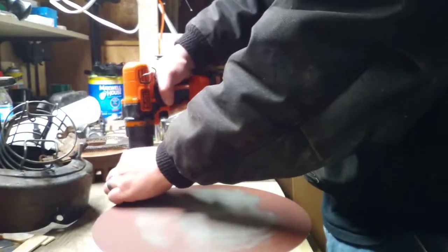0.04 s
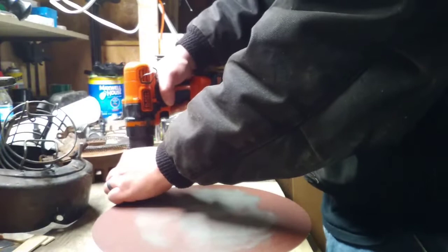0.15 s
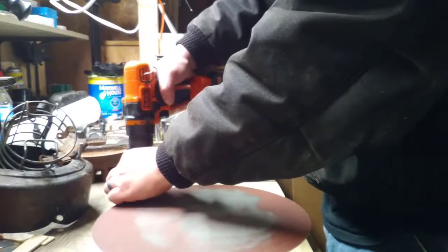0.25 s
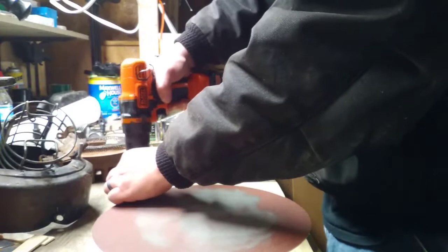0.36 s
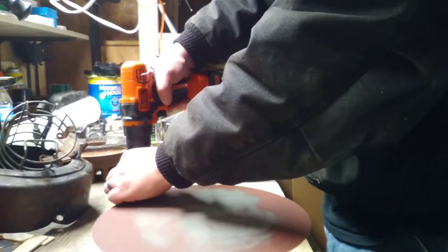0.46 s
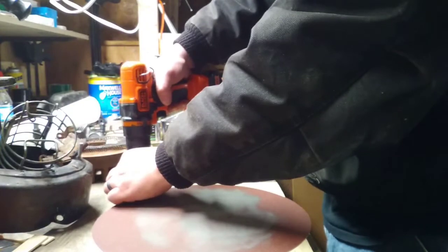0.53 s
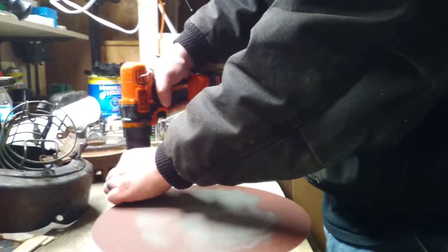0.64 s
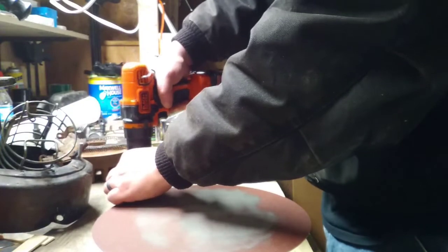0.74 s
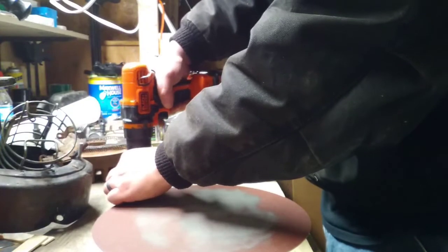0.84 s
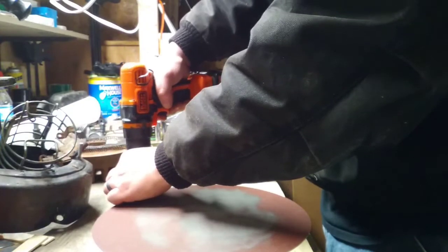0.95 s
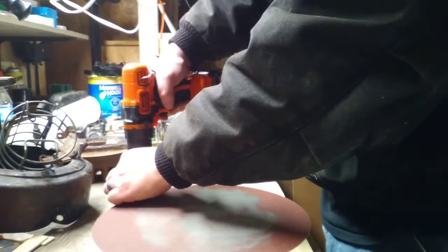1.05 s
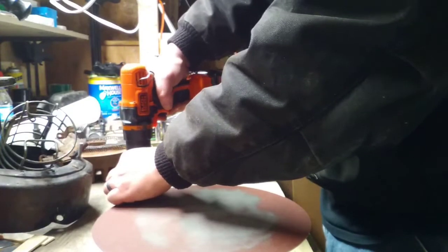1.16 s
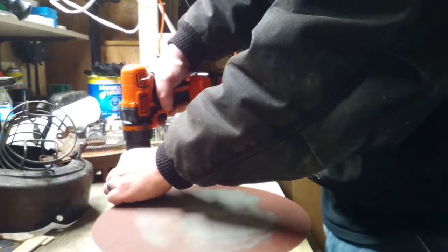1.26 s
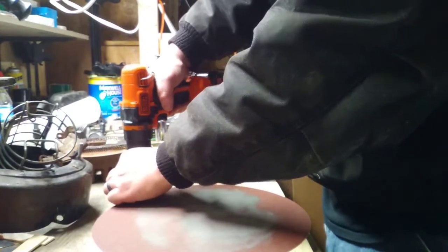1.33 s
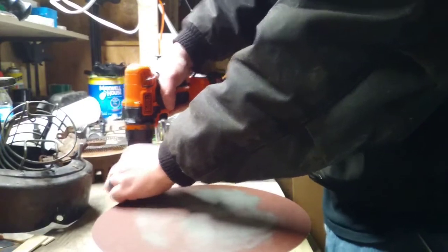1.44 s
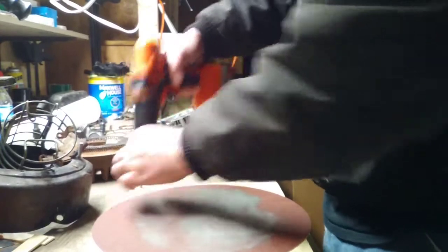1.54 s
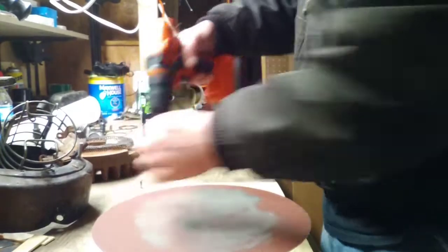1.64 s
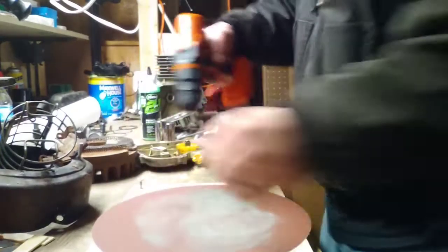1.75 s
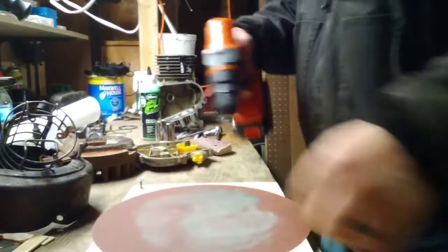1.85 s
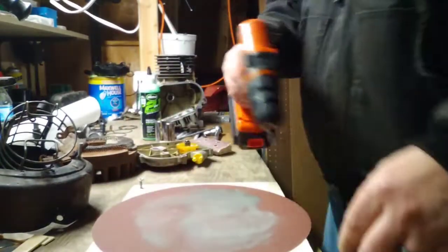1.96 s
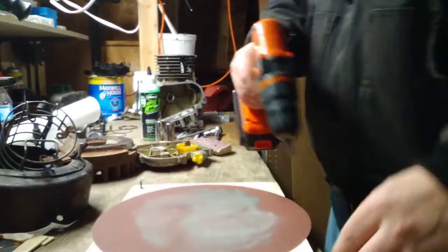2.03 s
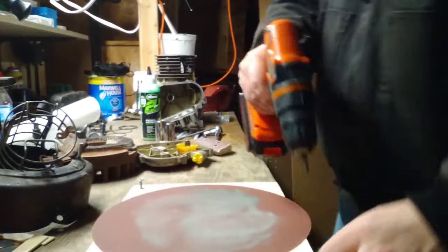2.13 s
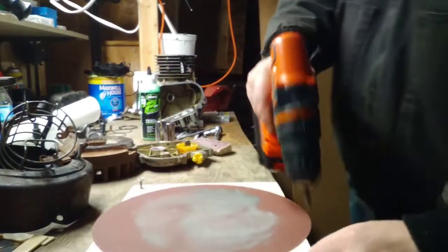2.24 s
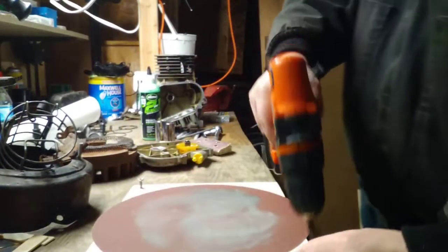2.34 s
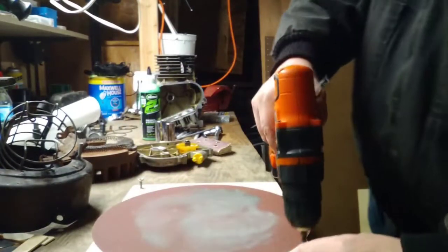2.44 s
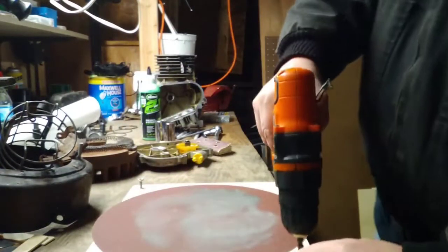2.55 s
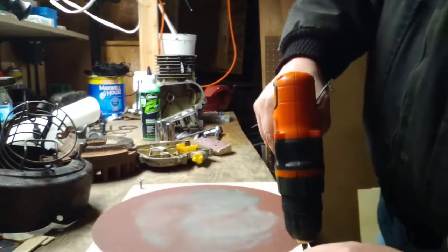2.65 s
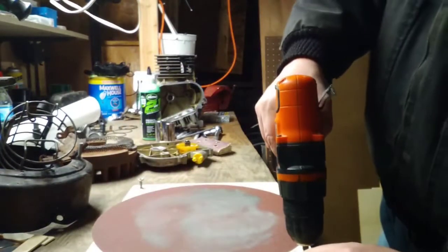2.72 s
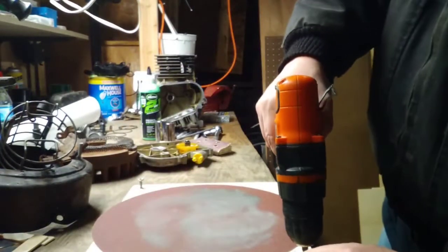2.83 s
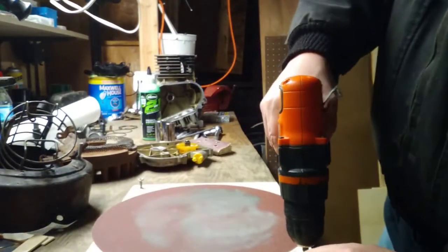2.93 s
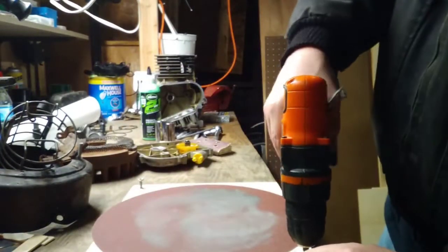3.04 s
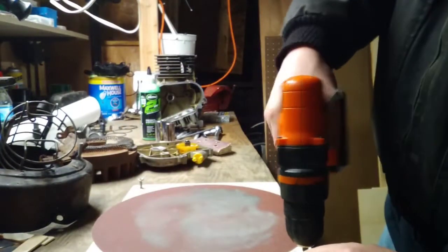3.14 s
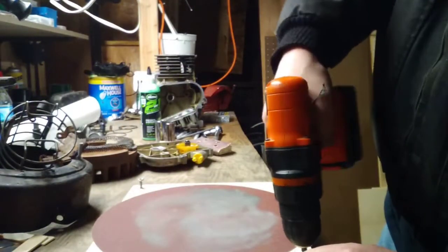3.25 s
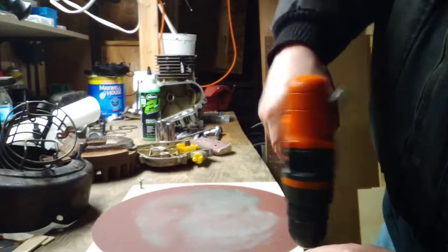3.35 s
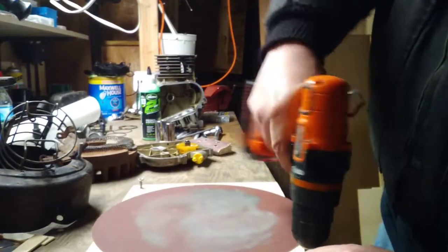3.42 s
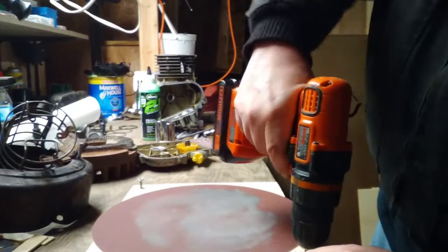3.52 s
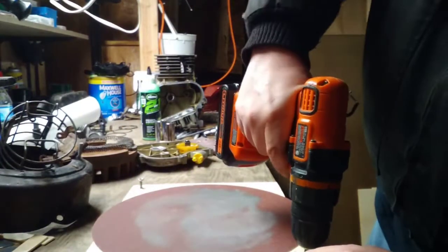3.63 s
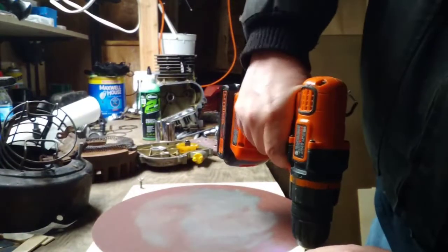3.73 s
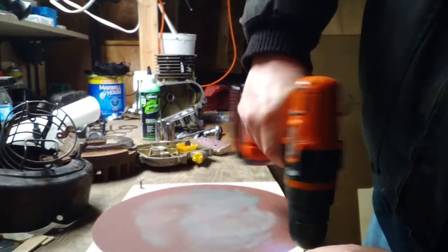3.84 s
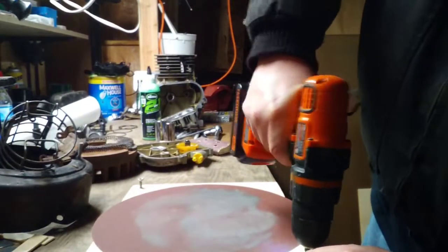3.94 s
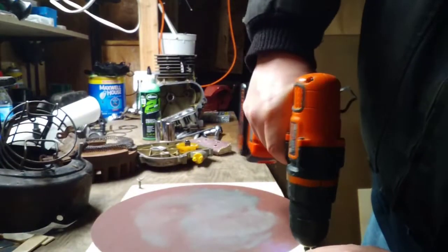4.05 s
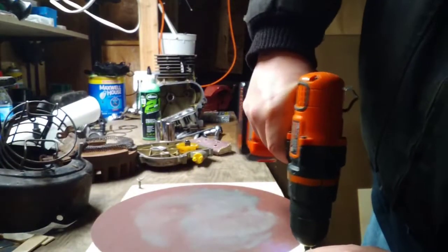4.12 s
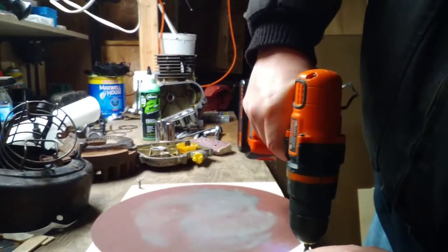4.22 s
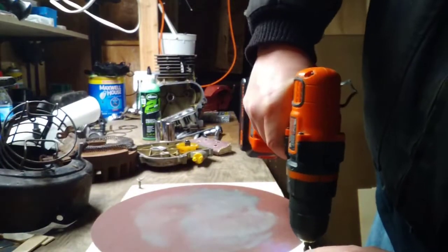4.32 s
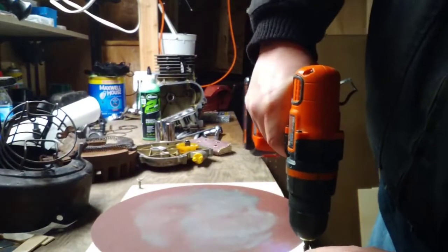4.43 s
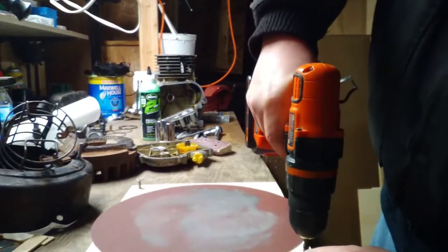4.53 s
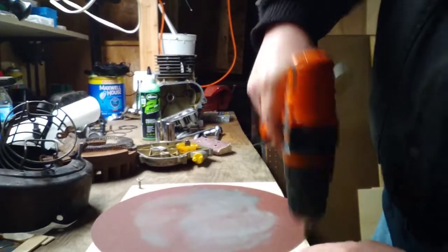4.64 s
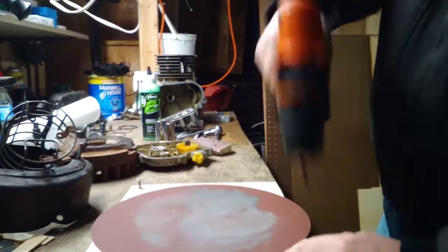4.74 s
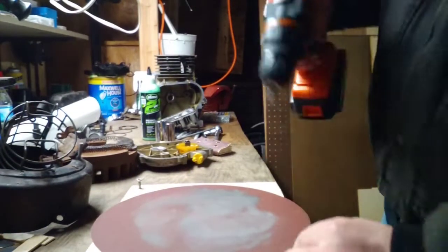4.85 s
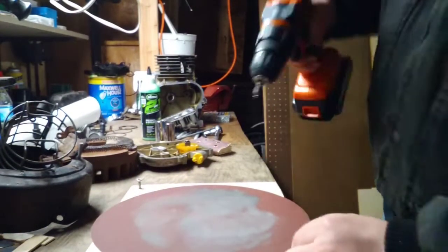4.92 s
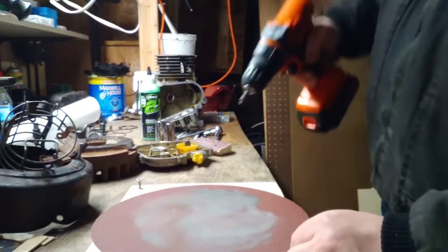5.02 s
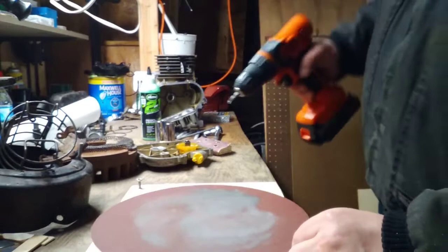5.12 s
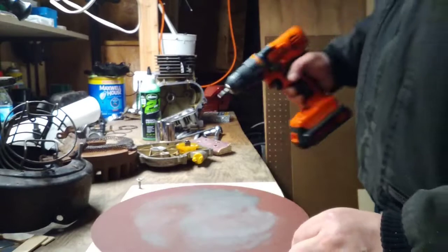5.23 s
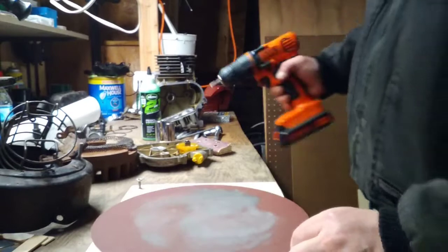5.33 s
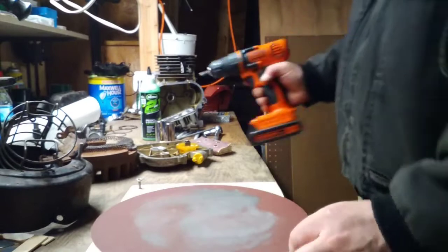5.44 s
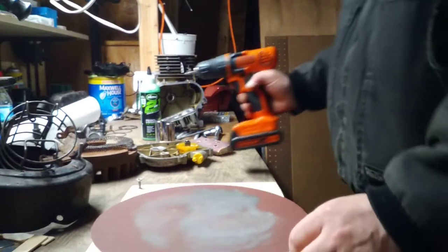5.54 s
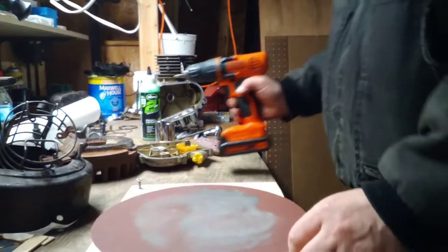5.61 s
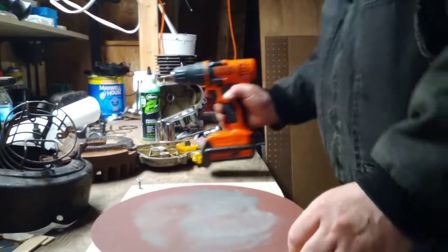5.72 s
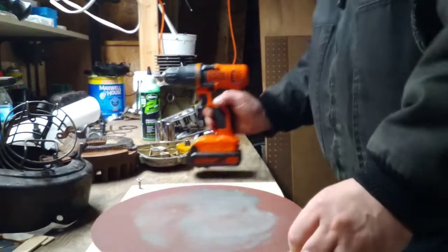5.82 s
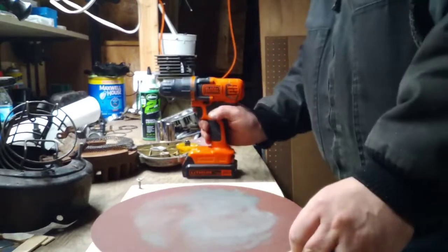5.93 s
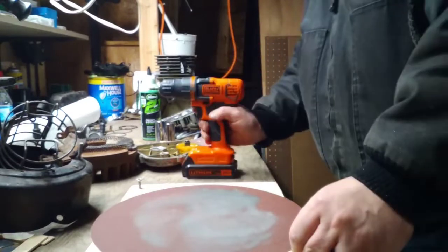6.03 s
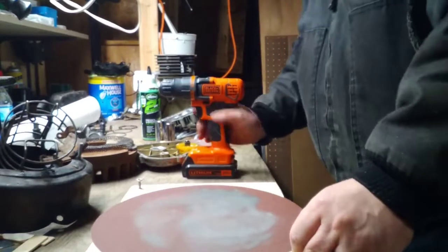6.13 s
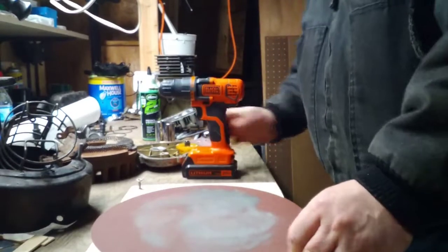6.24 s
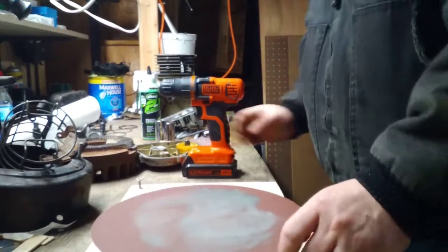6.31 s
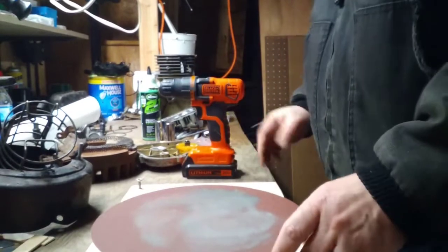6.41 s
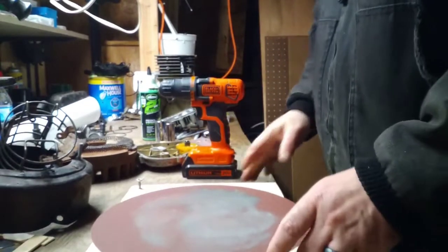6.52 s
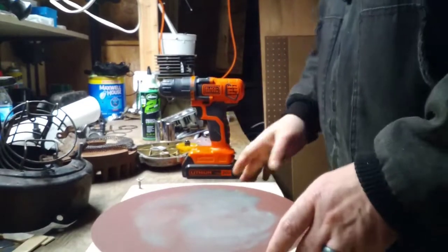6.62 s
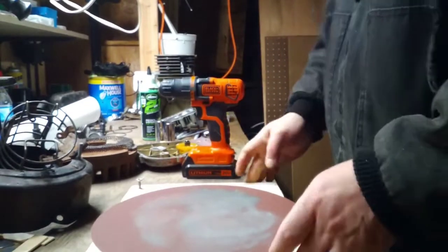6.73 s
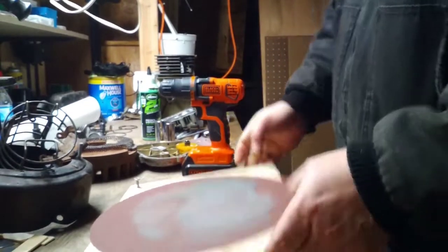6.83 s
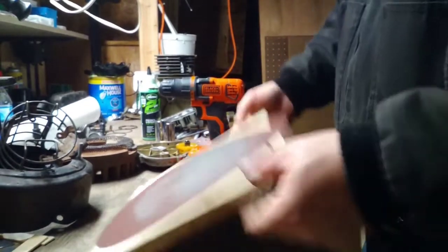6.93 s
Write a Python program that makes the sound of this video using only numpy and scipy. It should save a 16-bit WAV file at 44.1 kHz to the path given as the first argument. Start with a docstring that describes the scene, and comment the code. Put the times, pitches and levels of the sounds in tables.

```python
"""Cordless drill on a workbench

A drill backs two screws out of a board in a small wooden workshop and is set down hard.
Motor and gears whine up in two bursts as tones and noise locked to the shaft; blows and clicks are
pushes, decaying modes and rattles; loose things hop, a jacket rustles as filtered noise in quiet air.
Far off an engine drones as harmonics that gain speed. A phone with a microphone at each end listens."""
import sys
import numpy as np
from scipy import signal
from scipy.fft import rfft, irfft, next_fast_len
from scipy.io import wavfile
from scipy.ndimage import uniform_filter1d, minimum_filter1d, map_coordinates

SR = 44100
rng = np.random.default_rng(int(sys.argv[2]) if len(sys.argv) > 2 else 0)


def dump_mix(stems):
    """Bounce the given channels to the path in sys.argv[1] as a 16-bit WAV at rate SR."""
    frames = np.atleast_2d(stems).T  # one column per channel
    limited = np.clip(frames, -1, 1)  # hard clip at full scale
    pcm = np.round(limited * 32767).astype(np.int16)
    wavfile.write(sys.argv[1], SR, pcm)


N = 307394

# All levels in the tables are relative: mixing gains and filters follow.
# Air of the room: (frequency [Hz], spectral density [dB])
AIR_SPECTRUM = [(50, -17.5), (85, 0), (170, -8), (300, -17.5), (600, -20), (1500, -28), (2100, -26.5),
                (3200, -32), (5000, -36.5), (14000, -42.5)]
# Decay of the room: (frequency [Hz], t60 [s])
ROOM_DECAY = [(70, 0.21), (170, 0.3), (350, 0.2), (3000, 0.2), (10000, 0.13)]
# Likeness of diffuse sound at the two microphones: (frequency [Hz], correlation [-1 to 1])
MICROPHONE_LIKENESS = [(60, 0.36), (250, 0.92), (550, 0.95), (1200, 0.04)]
# Lift of the difference between the microphones: (frequency [Hz], gain [dB])
DIFFERENCE_LIFT = [(90, 6), (220, 9), (500, 10.5), (1000, 3.5), (2000, 2.5), (4000, 3), (8000, -4.5)]
# Exhaust tones of the distant engine: (multiple of engine speed [1], level [dB])
EXHAUST_TONES = [(3, 0), (4, -7), (5, -2), (6, -8), (9, -17), (10, -18)]
# Arm movements that rustle the jacket: (middle [s], half length to 1/e [s], level [dB])
ARM_MOVES = [(1.794, 0.77, -75), (5.006, 0.23, -75.5), (6.653, 0.23, -76), (6.794, 0.018, -66.5)]
# Rustle of cloth: (frequency [Hz], spectral density [dB])
CLOTH_SPECTRUM = [(80, -11), (300, 0.5), (3000, -6.5), (14000, -23.5)]
# Ringing modes of loose metal: (frequency [Hz], level [dB])
METAL_MODES = [(2900, 0.5), (5230, 1), (7700, -5.5), (11400, -8)]
# Bit, chuck and trigger contacts: (time [s], level [dB], thud and boom [dB], edge [dB])
CLICK_EVENTS = [(0.578, -32, -18.5, -28), (1.055, -45, -7.5, -20.5), (1.549, -41, -12, -23.5),
                (1.94, -47, -20.5, -27), (2.092, -40, -38, -16), (2.239, -44.5, -21, -26),
                (2.285, -16, -20.5, -10), (2.973, -18.5, -27.5, -22), (3.41, -53, -12, -20),
                (3.555, -26.5, -2.5, -14.5), (3.659, -46.5, -12, -22), (3.819, -47, -8.5, -7),
                (3.852, -36.5, -7, -23), (3.93, -15, -5, -9), (4.668, -26, -7.5, -28)]
# Modes of the chuck: (frequency [Hz], level [dB], t60 [s])
CHUCK_MODES = [(666.5, 2.5, 0.036), (3330, -13.5, 0.085), (7800, -12, 0.06)]
# Blows on board and bench: (time [s], level [dB], thud [dB], boom [dB], crack [dB],
# rebound delay [s], rebound level [dB], contact length [s], room level [dB])
BLOW_EVENTS = [(0.652, -47.5, -25, -8.5, -12, 0.016, -7, 0.046, -5.5),
               (0.687, -44.5, -3.5, -1.5, -13, 0.013, -1.5, 0.05, -17),
               (0.845, -18.5, -3.5, -6, -19, .008, -12, 0.041, -5.5),
               (1.343, -11, -8, -1, -10, .010, -3, 0.062, -8),
               (2.853, -21, -20, -12.5, -17.5, 0.019, -3, 0.059, -6),
               (2.972, -19.5, -25.5, -12.5, -23, 0.0097, -13, 0.095, -18),
               (4.789, -48.5, -12, -3, -33.5, 0.0072, -20.5, 0.032, -19),
               (6.048, -6.5, -6.5, -9, -10.5, .013, -5, 0.031, -5),
               (6.894, -35, -6, 2, -45.5, 0.01, -11.5, 0.067, -8.5)]
# Modes of the bench: (frequency [Hz], level [dB], t60 [s])
BENCH_MODES = [(78, 12, 0.13), (176, -3, .16), (300, -4, .12), (440, -2, .12), (660, -7, 0.1),
               (810, -3, 0.1), (1200, -3, .1)]
# Spectra of the parts of a contact, each: (frequency [Hz], spectral density [dB])
THUD_SPECTRUM = [(30, -47.5), (50, -22), (78, -3.5), (125, 3), (190, -3), (400, -43)]
BOOM_SPECTRUM = [(70, -29), (160, 5), (320, -2.5), (450, -6), (900, -46.5)]
WOOD_SPECTRUM = [(35, -41), (150, -4.5), (330, 4.5), (520, 0.5), (780, -4.5), (1200, -13), (1700, -15.5),
                 (2600, -21), (6000, -60.5)]
CRACK_SPECTRUM = [(700, -32.5), (1600, -25), (2800, -1), (4200, -8), (7000, -20), (11000, -17.5),
                  (14000, -37.5)]
PLASTIC_SPECTRUM = [(35, -43.5), (150, -16), (600, 0), (1500, 2.5), (2500, 1), (4000, -1.5), (5000, -14.5),
                    (9000, -35.5)]
EDGE_SPECTRUM = [(3000, -49), (5200, -3), (10000, -3), (14000, -10.5)]
# Trigger pulls: (on [s], off [s], top speed [turns/s], loosening time constant [s], gears [dB],
# gear drift [dB/s], brushes [dB], commutator tones [dB], board boom [dB], opposed gear noise [dB])
TRIGGER_PULLS = [(1.112, 1.39, 334, .08, -38.5, 16, -39, -12.5, 12.5, -11.5),
                 (3.92, 4.67, 352, .34, -31, -3, -34, 6, 0.5, 8.5)]
# Tones of rotor and gear train: (multiple of shaft speed [1], first screw [dB], second screw [dB])
GEAR_TONES = [(.575, -3, -10), (1, -5, -13), (1.25, -7, -23), (2, -11, -24), (2.495, -20, -7.5),
              (3.735, -25, -14.5), (5, -4, -14), (7.5, -26, -18), (10, -17, -19), (11.25, -24, -17.5)]
# Tones of the commutator: (multiple of shaft speed [1], level [dB])
COMMUTATOR_TONES = [(12, -18), (13, -20), (15, -16), (18, -16), (24, -18), (27, -13), (28, -17)]
# Response of the housing, which favours some pitches of the whine: (frequency [Hz], gain [dB])
HOUSING_RESPONSE = [(1100, 0.5), (4200, -2), (4700, 5.5), (5350, -6), (6100, 0.5), (8300, -8), (9300, 1.5),
                    (10200, -9)]
# Noise of gears and of brushes, each: (frequency [Hz], spectral density [dB])
GEARBOX_SPECTRUM = [(40, -14), (180, -10.5), (330, -2), (800, -3.5), (1350, -4), (1750, -5.5), (2300, -5),
                    (3300, -11.5), (4300, -15.5), (9000, -39)]
BRUSH_SPECTRUM = [(1500, -31), (3300, -4.5), (5500, -3), (8200, -1.5), (9300, 2.5), (12000, -1),
                  (14000, -15.5)]
# Band of gear noise in opposite phase at the two microphones: (frequency [Hz], spectral density [dB])
OPPOSED_SPECTRUM = [(900, -30), (1900, 1), (2350, 0), (3300, -27)]

AIR_DB = -69
# The distant engine cruises, then from PULL_AWAY_S gains speed and grows louder over SWELL_S
CRUISE_HZ, PULL_AWAY_S, GAIN_HZ_PER_S = 28.6, 4.45, 3.9
CRUISE_DB, PULLING_DB, SWELL_S = -77, -65.5, 0.82
# Blows above HEAVY_DB make the loose things hop HOPS times within SHAKE_S, ever more weakly
HEAVY_DB, HOPS, SHAKE_S, SHAKE_DB_PER_S = -10, 120, .2, 125
TAP_DB, TICK_DB, JINGLE_DB, METAL_T60_S = -38, -48.5, -55.5, 0.14
JANGLE_RAD = 2  # parts that touch blur each other's ring
# A longer contact is more rattle than push, and rises over this share of its length
HARD_CONTACT_S, RISE_SHARE = 0.044, 0.058
REBOUND_DULL_DB = -4  # a rebound has less crack
# The weight comes down after the blow; wood and boom against its thud
SETTLE_S, SETTLE_WOOD_DB, SETTLE_BOOM_DB = 0.014, -17, -14.5
FIRST_THUD_DB = -9.5  # thud of a contact against that of the weight
# The tight screw holds the shaft back [turns/s]; START_LACK is the share of speed missing at switch-on
SCREW_DRAG, START_LACK, SPIN_UP_S = 78, .6, .03
PLAY_TURNS = .004  # play in the bearings
BRUSH_DB_PER_OCTAVE = 7  # the brushes hiss louder with speed
GEAR_STOP_S, BRUSH_STOP_S = 0.005, 0.0026  # fade time constants once the trigger is let go
# Jolt of the housing at switch-on: level, pitch, delay and half length to 1/e
KICK_DB, KICK_HZ, KICK_AT_S, KICK_S = -27, 605, .016, .0061
COMB_HZ = 2091  # sound takes one period of this to cross the phone
TOP_HZ = 14300  # nothing passes from here up


def amp(db):
    """Logarithmic level: decibels to gain."""
    return 10 ** (np.asarray(db) / 20)


def unit(x):
    """Normalisation of power: x scaled to rms 1."""
    return x / np.sqrt(np.mean(x ** 2) + 1e-20)


def along(points, hz):
    """Interpolation on a logarithmic frequency axis of (frequency [Hz], value) points."""
    f, v = np.transpose(points)
    return np.interp(np.log(hz + 1), np.log(f + 1), v)


def wobble(rate, size):
    """Band-limited fluctuation: a smooth random curve with rate knots a second."""
    knots = rng.standard_normal(int(size * rate / SR) + 4)
    return map_coordinates(knots, [np.arange(size) * rate / SR])


def filtered(x, response):
    """Linear filtering: the spectrum of x times a response of frequency."""
    n = x.shape[-1]
    m = next_fast_len(n + 8192)
    return irfft(rfft(x, m) * response(np.fft.rfftfreq(m, 1 / SR)), m)[..., :n]


def coloured(x, spectrum, size=4096):
    """Minimum phase: a causal filter is found by folding the cepstrum of the given spectrum."""
    cepstrum = irfft(np.log(amp(along(spectrum, np.fft.rfftfreq(size, 1 / SR)))))
    cepstrum[1:size // 2] *= 2
    cepstrum[size // 2 + 1:] = 0
    impulse_response = irfft(np.exp(rfft(cepstrum)))
    return signal.fftconvolve(x, impulse_response[None], axes=1)[:, :x.shape[1]]


def diffuse(size):
    """Spatial correlation: noise from all sides, most alike at the two microphones around 250 to 550 Hz."""
    turn = lambda hz: np.arccos(np.clip(along(MICROPHONE_LIKENESS, hz), -1, 1)) / 2
    shares = lambda hz: np.array([np.cos(turn(hz)), np.sin(turn(hz))])
    mid, side = filtered(rng.standard_normal((2, size)), shares)
    return np.array([mid + side, mid - side])


def in_shop(x, wet_db, near_db, count=2):
    """Reverberation: direct sound, scatter from clutter on the bench, and the decaying room."""
    hz, t, z = signal.stft(diffuse(SR // 2), SR, nperseg=256)
    decay = amp(-60 * t / along(ROOM_DECAY, hz)[:, None])
    build_up = 1 - np.exp(-t / 0.0088)
    tail = signal.istft(z * decay * build_up, SR, nperseg=256)[1]
    near = diffuse(tail.shape[1]) * np.exp(-np.arange(tail.shape[1]) / SR / .003)
    paths = amp(wet_db) * tail / np.linalg.norm(tail[0]) + amp(near_db) * near / np.linalg.norm(near[0])
    echo = signal.fftconvolve(x[None], paths, axes=1)[:, :len(x)]
    # the direct sound reaches the second microphone count samples later
    direct = np.array([x, np.pad(x, (count, 0))[:len(x)]])
    return direct + echo


def add(out, s, x):
    """Superposition: mix x into out from the time s."""
    part = out[:, round(s * SR):][:, :x.shape[1]]
    part += x[:, :part.shape[1]]


def room_air():
    """Diffuse field: steady noise is the quiet, even air of the workshop."""
    return amp(AIR_DB) * unit(coloured(diffuse(N), AIR_SPECTRUM))


def distant_engine():
    """Harmonic radiation through walls: only low exhaust tones, each wavering slightly on its own."""
    pulling_s = np.maximum(np.arange(N) / SR - PULL_AWAY_S, 0)
    turns = np.cumsum(CRUISE_HZ + GAIN_HZ_PER_S * pulling_s) / SR
    level_db = np.interp(pulling_s, [0, SWELL_S], [CRUISE_DB, PULLING_DB])
    drone = np.zeros(N)
    for order, db in EXHAUST_TONES:
        level = amp(db + 0.59 * wobble(0.8, N))
        drone += level * np.sin(2 * np.pi * order * turns + 0.22 * wobble(4.4, N))
    # slightly louder at the second microphone
    return amp(level_db) * drone * amp([[-1], [1]])


def jacket():
    """Friction noise: the sleeves rustle faintly and unevenly while the arms move."""
    t = np.arange(N) / SR
    motion = sum(amp(db) * np.exp(-((t - s) / half_s) ** 2) for s, half_s, db in ARM_MOVES)
    return motion * amp(1.9 * wobble(18, N)) * unit(coloured(diffuse(N), CLOTH_SPECTRUM))


def loose_things():
    """Repeated impact: after a heavy blow small parts hop, tapping the wood and ringing the metal."""
    out = np.zeros((2, N))
    t = np.arange(SR // 2) / SR
    for s, db, *_ in BLOW_EVENTS:
        if db > HEAVY_DB:
            after = SHAKE_S * rng.random(HOPS)
            size_db = rng.normal(0, 3, HOPS)
            hops = np.bincount((after * SR).astype(int), amp(size_db - SHAKE_DB_PER_S * after), len(t))
            ring = np.zeros(len(t))
            for hz, level in METAL_MODES:
                phase = 2 * np.pi * hz * t + JANGLE_RAD * wobble(500, len(t))
                ring += amp(level - 60 * t / METAL_T60_S) * np.sin(phase)
            taps = in_shop(hops, wet_db=4, near_db=2)
            jingle = signal.fftconvolve(taps, ring[None], axes=1)[:, :len(t)]
            add(out, s, amp(db + TAP_DB) * unit(coloured(taps, WOOD_SPECTRUM)))
            add(out, s, amp(db + TICK_DB) * unit(coloured(taps, CRACK_SPECTRUM)))
            add(out, s, amp(db + JINGLE_DB) * unit(jingle))
    return out


def blow(modes, parts, ring_db, rattle_db, rattle_t60, rise, wet_db, near_db):
    """Modal excitation: a push, ringing modes and a short rattle, split into (spectrum, dB) parts."""
    t = np.arange(SR // 2) / SR
    push = unit(signal.unit_impulse(len(t)))
    ring = np.zeros(len(t))
    for hz, db, t60 in modes:
        strength = amp(db + rng.normal(0, 2.5))
        ring += strength * amp(-60 * t / t60) * np.sin(2 * np.pi * (hz * t + rng.random()))
    rattle = unit(rng.standard_normal(len(t)) * amp(-60 * t / rattle_t60) * (1 - np.exp(-t / rise)))
    contact = push + amp(ring_db) * unit(ring) + amp(rattle_db) * rattle
    heard = in_shop(contact, wet_db, near_db)
    return sum(amp(db) * unit(coloured(heard, spectrum)) for spectrum, db in parts)


def clicks():
    """Hard contact of light bodies: bit, chuck and trigger give short, bright impacts."""
    out = np.zeros((2, N))
    for s, db, thud_db, edge_db in CLICK_EVENTS:
        parts = [(PLASTIC_SPECTRUM, db - 30.5), (THUD_SPECTRUM, db + thud_db - 26.0),
                 (BOOM_SPECTRUM, db + thud_db - 22.0), (EDGE_SPECTRUM, db + edge_db - 20.5)]
        add(out, s - .001, blow(CHUCK_MODES, parts, ring_db=-4, rattle_db=15, rattle_t60=0.024,
                                rise=0.0072, wet_db=-10.5, near_db=0))
    return out


def knocks():
    """Impact and rebound: drill or hand lands, rebounds once, and its weight settles with a low thud."""
    out = np.zeros((2, N))
    for s, db, thud_db, boom_db, crack_db, rebound_s, rebound_db, contact_s, room_db in BLOW_EVENTS:
        strike = lambda parts: blow(
            BENCH_MODES, parts, ring_db=-11.0, rattle_db=20 * np.log10(contact_s / HARD_CONTACT_S),
            rattle_t60=contact_s, rise=RISE_SHARE * contact_s, wet_db=room_db, near_db=-5)
        weight_db = db + thud_db - 19.0
        for after, level, dull_db in [(0, db, 0), (rebound_s, db + rebound_db, REBOUND_DULL_DB)]:
            parts = [(WOOD_SPECTRUM, level - 19.5), (BOOM_SPECTRUM, level + boom_db - 18.0),
                     (THUD_SPECTRUM, weight_db + FIRST_THUD_DB),
                     (CRACK_SPECTRUM, level + crack_db + dull_db - 26)]
            add(out, s + after, strike(parts))
        settling = [(THUD_SPECTRUM, weight_db), (WOOD_SPECTRUM, weight_db + SETTLE_WOOD_DB),
                    (BOOM_SPECTRUM, weight_db + SETTLE_BOOM_DB)]
        add(out, s + SETTLE_S, strike(settling))
    return out


def shaft_speed(age, top, loosen_s):
    """Torque against load: quick spin-up, then a creep toward top speed as the screw loosens [turns/s]."""
    return (top - SCREW_DRAG * np.exp(-age / loosen_s)) * (1 - START_LACK * np.exp(-age / SPIN_UP_S))


def tones(table, turns, waver_db, slop):
    """Order locking: lines follow the shaft; play in the bearings wavers their level and phase."""
    n = len(turns)
    total = np.zeros(n)
    for order, db in table:
        level = np.sqrt(2) * amp(db + waver_db * wobble(12, n))
        total += level * np.sin(2 * np.pi * (order * turns + rng.random()) + slop * wobble(45, n))
    return total


def chatter(turns, count, repeat_share, grain_db, size=128):
    """Cyclic contact: grainy noise, a share repeating every count turns as overtones that rise with speed."""
    n = len(turns)
    angle = turns + PLAY_TURNS * wobble(60, n)
    surface = rng.standard_normal(count * size)
    worn = unit(map_coordinates(surface, [angle * size], mode="grid-wrap"))
    contact = np.sqrt(repeat_share) * worn + np.sqrt(1 - repeat_share) * rng.standard_normal(n)
    return unit(contact * amp(grain_db * wobble(500, n)))


def starting_jolt(age):
    """Torque reaction: the starting torque jolts the housing, a brief tone burst."""
    return amp(KICK_DB) * np.sin(2 * np.pi * KICK_HZ * age) * np.exp(-((age - KICK_AT_S) / KICK_S) ** 2)


def drill():
    """Rotating machinery: shaft-locked tones and noise while the trigger is held, fading fast after."""
    out = np.zeros((2, N))
    age = np.arange(round(1.2 * SR)) / SR
    for pull, (on, off, top, loosen_s, gear_db, drift_db, brush_db,
               commutator_db, board_db, opposed_db) in enumerate(TRIGGER_PULLS):
        switch_on = 1 - np.exp(-age / 0.00053)
        released_s = np.maximum(on + age - off, 0)
        speed = shaft_speed(age, top, loosen_s)
        turns = np.cumsum(speed) / SR
        gear = switch_on * np.exp(-released_s / GEAR_STOP_S) * amp(gear_db + drift_db * age)
        brush_level = amp(brush_db + BRUSH_DB_PER_OCTAVE * np.log2(speed / top))
        brush = switch_on * np.exp(-released_s / BRUSH_STOP_S) * brush_level
        # the tones fade in as the shaft gathers speed
        spun = 1 - np.exp(-age / .09)
        gear_table = [(order, levels[pull]) for order, *levels in GEAR_TONES]
        mesh = tones(gear_table, turns, waver_db=2.5, slop=0.5)
        singing = amp(commutator_db) * tones(COMMUTATOR_TONES, turns, waver_db=1.8, slop=0.8)
        whine = spun * (gear * mesh + brush * singing)
        whine_heard = in_shop(whine + starting_jolt(age), wet_db=-10, near_db=-12)
        add(out, on, coloured(whine_heard, HOUSING_RESPONSE))
        # the gear teeth repeat on every fourth turn; the bit passes the grinding to the board, which booms
        teeth = gear * chatter(turns, count=4, repeat_share=.22, grain_db=2.7)
        grinding = in_shop(teeth, wet_db=-7, near_db=-8)
        add(out, on, amp(11.5) * coloured(grinding, GEARBOX_SPECTRUM))
        add(out, on, amp(board_db) * coloured(grinding, BOOM_SPECTRUM))
        # a band of gear noise around 2 kHz, in opposite phase at the two microphones
        gear_noise = gear * chatter(turns, count=4, repeat_share=.1, grain_db=3)
        opposed = in_shop(gear_noise, wet_db=-7, near_db=-8)
        add(out, on, amp(opposed_db) * coloured(opposed, OPPOSED_SPECTRUM) * [[1], [-1]])
        # the brushes repeat their ticks on every turn, louder at the first microphone
        sparks = brush * chatter(turns, count=1, repeat_share=.22, grain_db=2.7)
        hissing = in_shop(sparks, wet_db=-7, near_db=-7)
        add(out, on, amp(5.0) * coloured(hissing, BRUSH_SPECTRUM) * amp([[2.2], [-1.8]]))
    return out


def scene():
    """Superposition of everything on and around the bench."""
    background = room_air() + distant_engine() + jacket()
    contacts = loose_things() + clicks() + knocks() * amp([[.4], [-.4]])  # microphone balance [dB]
    return background + contacts + drill()


def limited(x, ceiling, size=177):
    """Gain reduction: the level ducks for a few milliseconds around peaks above the ceiling."""
    needed = np.minimum(1, ceiling / (np.abs(x).max(axis=0) + 1e-9))
    return x * uniform_filter1d(minimum_filter1d(needed, size), size)


def record(dry):
    """Delay and subtract: each microphone minus the delayed other combs sum and difference; then a limiter."""
    depth_points = [(350, 0.012), (900, 1.0), (2100, 0.92), (6000, 0.25), (13000, 0.0)]  # (Hz, share)
    depth = lambda hz: np.clip(along(depth_points, hz), 0, 1)
    cross = lambda hz: depth(hz) * np.exp(-2j * np.pi * hz / COMB_HZ)
    low_cut = lambda hz: (1j * hz / (1j * hz + 35)) ** 2
    lift = lambda hz: amp(along(DIFFERENCE_LIFT, hz))
    combs = lambda hz: np.array([1 - cross(hz), (1 + cross(hz)) * lift(hz)]) / np.hypot(1, depth(hz))
    pair = np.array([dry[0] + dry[1], dry[0] - dry[1]]) / 2
    mid, side = filtered(pair, lambda hz: combs(hz) * low_cut(hz))
    both = limited(np.array([mid + side, mid - side]), ceiling=.93)
    return filtered(both, lambda hz: hz < TOP_HZ)


dry = scene()
out = record(dry)
dump_mix(out)
```